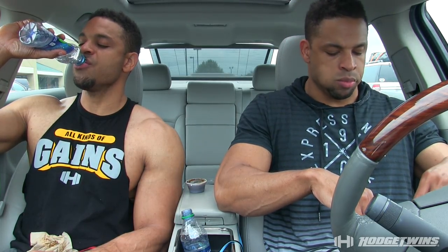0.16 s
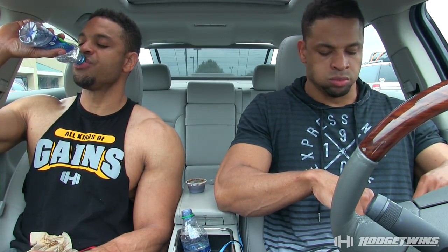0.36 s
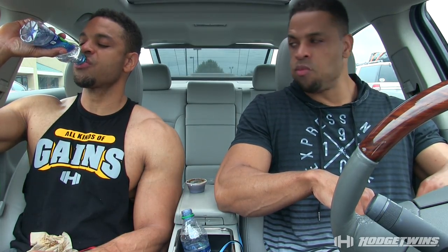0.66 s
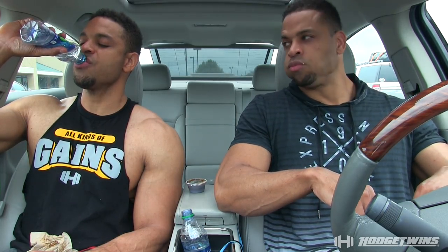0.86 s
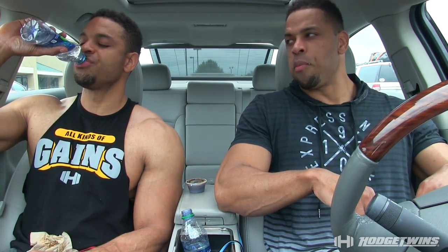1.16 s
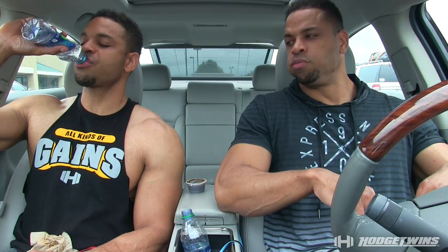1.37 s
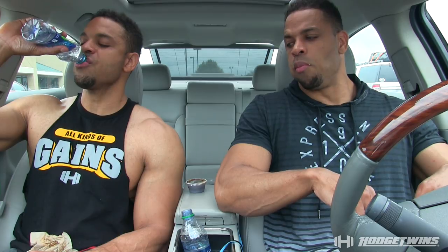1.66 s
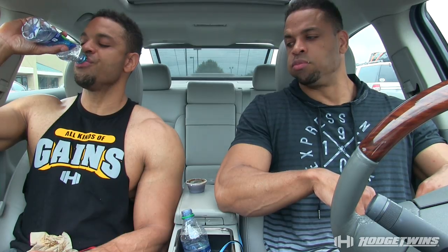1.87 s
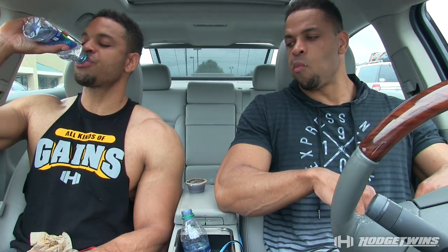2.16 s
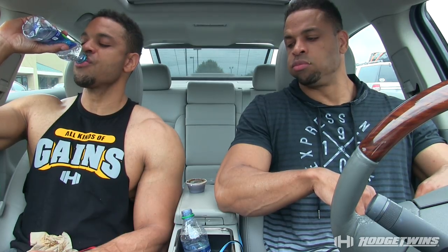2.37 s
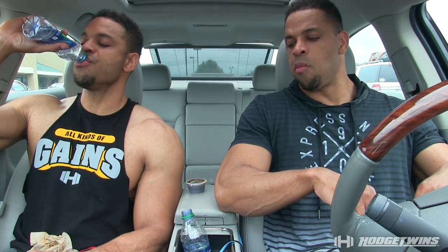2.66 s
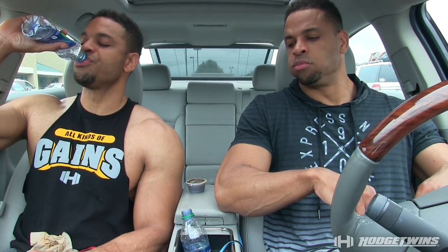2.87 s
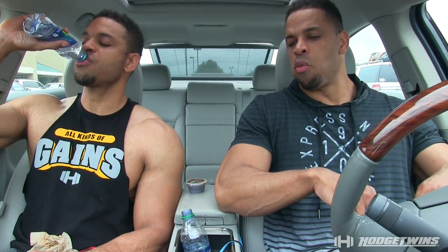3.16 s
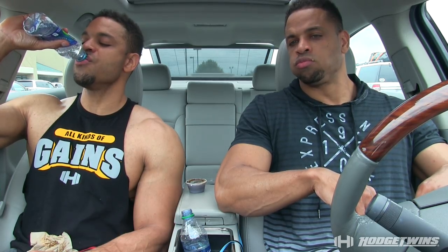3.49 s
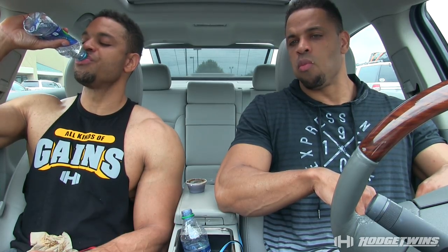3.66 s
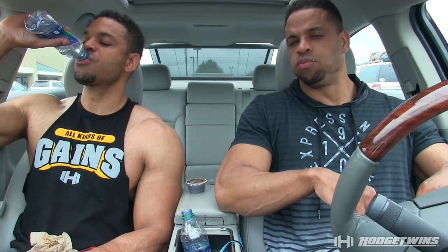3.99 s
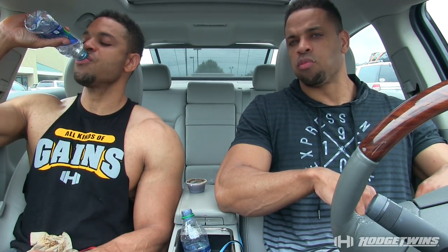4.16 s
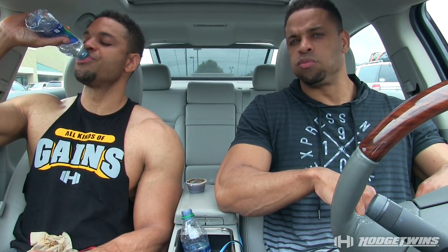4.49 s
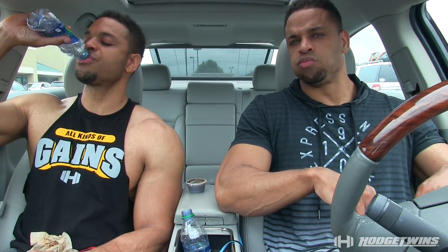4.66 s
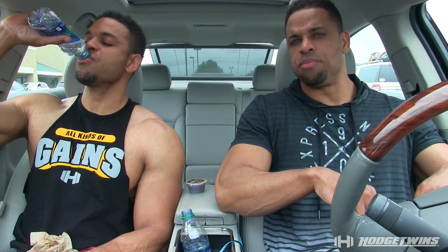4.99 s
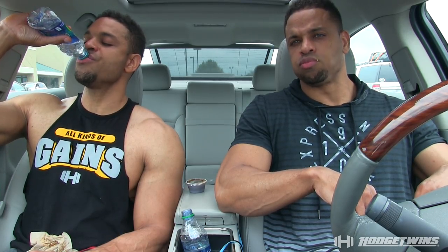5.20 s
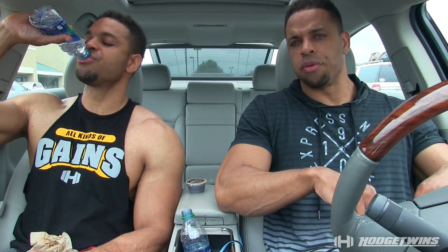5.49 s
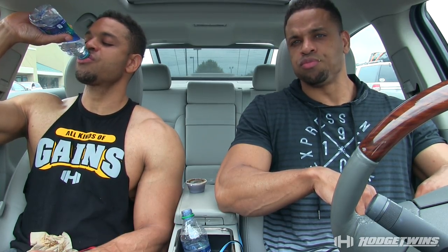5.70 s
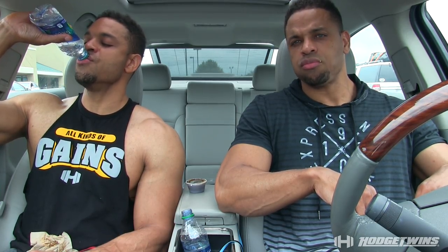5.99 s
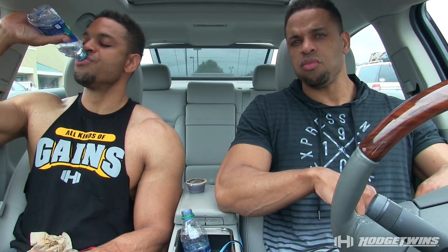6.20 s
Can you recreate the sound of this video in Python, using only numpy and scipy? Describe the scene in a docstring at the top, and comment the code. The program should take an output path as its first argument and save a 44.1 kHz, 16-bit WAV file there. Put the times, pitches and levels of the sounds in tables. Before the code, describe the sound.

Close stereo pickup inside a parked car, dry and padded, with a quiet low hum steady throughout. A thin ribbed plastic bottle, left of centre, is squeezed while someone drinks. A faint tick and a moderate click come near 0.2 s, then a brisk crackling burst from 0.7 to 1.0 s, strongest at the end, and a hard snap at 1.3. Only weak ticks follow until duller hollow pops around 2.4 to 2.7. Sharp snaps return at 3.1 and 3.45, then a pause, a very strong crack at 4.2, another at 4.35, and a tight cluster around 5.0. Sparse weak ticks lead to a last small crackle at 5.9 to 6.1. Between snaps are tiny grip rustles, faint rising bubbles, clearest near 4.75, a soft water wash stirred by the snaps, and barely audible high air whistles near 0.5, 3.9 and 6.1.

```python
"""Sharp plastic snaps, left of centre: a thin water bottle is squeezed by a drinker in a parked car.
Each snap is a noise click filtered by the ribbed wall, the hollow body and one panel; it dies fast.
Between snaps: grip rustles from clusters of tiny slips, bubbles as rising sines, thin whistles of air.
Under them: shaped noise for the run of water, stirred by each snap, and a low steady cabin hum."""
import sys
import numpy as np
from scipy import signal
from scipy.fft import rfft, irfft, next_fast_len
from scipy.io import wavfile
from scipy.ndimage import uniform_filter1d, map_coordinates

SR = 44100
rng = np.random.default_rng(int(sys.argv[2]) if len(sys.argv) > 2 else 0)


def inscribe(sig):
    """Save sig as 16-bit PCM at rate SR to the path in sys.argv[1].

    A 1-D sig is mono; a 2-D sig holds one channel per row.
    Samples are clipped to [-1, 1] before scaling.
    """
    pcm = np.round(np.clip(np.atleast_2d(sig).T, -1, 1) * 32767)
    wavfile.write(sys.argv[1], SR, pcm.astype(np.int16))


N = 279594  # samples


def amp(db):
    """Decibels to amplitude gain."""
    return 10 ** (np.asarray(db) / 20)


def unit(x):
    """Scale to rms 1."""
    return x / np.sqrt(np.mean(x ** 2) + 1e-20)


def along(points, hz):
    """Interpolate (f/Hz, value) points on a log frequency axis."""
    point_hz, values = np.transpose(points)
    return np.interp(np.log(hz + 1), np.log(point_hz), values)


def wobble(knots_per_s):
    """Smooth random curve of N samples through normal random knots."""
    knots = rng.standard_normal(int(N * knots_per_s / SR) + 4)
    return map_coordinates(knots, [np.arange(N) * knots_per_s / SR])


def filtered(x, response):
    """Apply a gain that is a function of frequency in Hz."""
    padded = next_fast_len(N + SR // 2)
    gain = response(np.fft.rfftfreq(padded, 1 / SR))
    return irfft(rfft(x, padded) * gain, padded)[..., :N]


def causal(db):
    """Minimum-phase response with these gains: rings only after the blow."""
    cepstrum = irfft(np.log(amp(db)))
    half = len(cepstrum) // 2
    cepstrum[1:half] *= 2
    cepstrum[half + 1:] = 0
    return np.exp(rfft(cepstrum))


def bump(hz, centre_hz, width):
    """Resonance of height 1; width is the half-width at half height over the centre frequency."""
    return 1 / (1 + ((hz - centre_hz) / (width * centre_hz)) ** 2)


def stereo(pair, side_db, left_db):
    """Two unrelated signals as mid and side; left gets left_db more gain than right."""
    mid, side = pair[0], amp(side_db) * pair[1]
    left = (mid + side) * amp(left_db / 2)
    right = (mid - side) * amp(-left_db / 2)
    return np.array([left, right])


def add(track, start_s, sound):
    """Mix a sound into the track at start_s."""
    start = max(round(start_s * SR), 0)
    room = track[:, start:start + sound.shape[1]]
    room += sound[:, :room.shape[1]]


def cabin(t, sharp_db=0, left_db=2.0, t60_s=0.072, crack_t60_s=0.019, direct_db=13,
          creep_db=-9, creep_t60_s=0.0046, smooth_hz=420, lead_samples=192):
    """One click in the car: the crease creeps, cracks, and a short padded tail follows."""
    age = t - lead_samples / SR
    after = amp(-60 * np.abs(age) / t60_s) + amp(sharp_db - 60 * np.abs(age) / crack_t60_s)
    before = amp(creep_db - 60 * np.abs(age) / creep_t60_s)
    paths = rng.standard_normal((2, len(t))) * np.where(age < 0, before, after)
    paths[0, lead_samples + round(0.0009 * SR)] += amp(direct_db + sharp_db)
    spectrum = rfft(paths)
    # Level the broad colour; keep the fine comb of the many paths.
    smooth_bins = max(round(smooth_hz * len(t) / SR), 1)
    power = uniform_filter1d(np.abs(spectrum) ** 2, smooth_bins, axis=1)
    flat = spectrum / np.sqrt(np.abs(power) + 1e-12)
    # Long waves are nearly alike in both channels.
    side_db = along([(150, -17), (700, -6), (3000, -6.5)], np.fft.rfftfreq(len(t), 1 / SR))
    click = irfft(stereo(flat, side_db, left_db))
    return click * (t < t[-1] / 2)


# Broad colour of the wall, common to all snaps: f/Hz, level/dB
WALL_COLOUR = [(60, -25), (180, -8.5), (250, -11.5), (335, -1), (410, -6), (650, 2.5), (1000, -2.5),
               (1600, -2), (2300, -6.5), (3300, -1), (4300, -10), (5300, -9), (8000, -10), (12000, -16),
               (16000, -26.5)]
# Standing waves of the ribbed wall and the nulls between them: f/Hz, level/dB
RIB_MODES = [(450, -2.5), (645, -1), (790, 1), (912, -3.5), (968, 5), (1025, -8), (1085, 4), (1190, -0.5),
             (1450, 0), (1545, 4), (1700, -1.5), (1806, 2), (1875, -4.5), (1989, 7.5), (2123, 5.5),
             (2180, -2), (2255, 4), (2531, 4.5), (2740, 6), (3072, 3), (3376, -0.5), (3794, 4.5), (5100, 7),
             (5772, 5.5), (7341, 2.5)]


def ribbed_wall(hz, rib_half_width_hz=34, floor_db=-2):
    """Gain in dB of the ribbed wall: broad colour plus narrow modes and nulls."""
    ribs = sum(db * bump(hz, f, rib_half_width_hz / f) for f, db in RIB_MODES)
    # A small bottle radiates little deep bass.
    bass_cut = along([(110, -9.5), (170, 0)], hz)
    return along(WALL_COLOUR, hz) + floor_db + ribs + bass_cut


SNAP_LEFT_DB = 3
TREBLE_DB, TREBLE_SHARE = 3.5, 0.42  # lift at 5 kHz; share of brightness added there

# Wall buckles: t/s, level/dB, sharpness/dB, bass/dB, brightness/dB,
# hollow f/Hz, hollow level/dB, panel f/Hz, panel level/dB
BUCKLES = [(0.1753, -23, -5, -13, 20.5, 662, -5, 4050, 13.5), (0.2517, 6, -17, 2.5, -4, 464, 7, 2360, 12),
           (0.696, 6.5, -26, -4, -3.5, 630, 18, 2480, 8), (0.7068, 10, -6, 7, -4, 543, 4, 1090, 1.5),
           (0.856, -14, -5.5, 1, 10, 765, 16.5, 4113, 7), (0.908, 17.5, -5.5, -4, 5, 475, 0.5, 4200, 5),
           (0.959, 15, 0, 6, 8, 480, 6, 3540, 5.5), (1.2727, 15, -3, 3.5, 3.5, 590, 4, 2001, 13.5),
           (1.5886, -30.5, -8, -7, 17.5, 677, 0, 2130, 8), (1.6526, -24.5, 18, 18, -31, 743, 18, 1100, 19),
           (1.8365, -22, 4, -11.5, 4, 1100, 3, 3025, 4), (2.3253, -18, -12.5, 5, -4.5, 475, 4, 2650, 6.5),
           (2.4103, 8.5, -1.5, 0.5, -4, 596, 14, 1090, 1.5), (2.583, 2, 2, -7, -30, 630, 11, 1070, 8),
           (2.671, -7.5, -5.5, 3.5, -36.5, 794, 11, 1530, 11),
           (2.7246, 1.5, -4.5, -2, 2, 710, 2.5, 1850, 8), (3.1281, 16, -0.5, -6.5, -3.5, 784, 5, 4740, 11),
           (3.41, 3.5, 3, -1.5, -20.5, 635, 8, 1890, 5.5), (3.4545, 16, -3, 3, 7.5, 637, 10.5, 1080, 10),
           (3.5094, 2.5, -8, -10.5, -4.5, 539, 9.5, 3670, 4), (3.573, -24, -9, 0, -1, 592, 12, 3500, 1),
           (3.6389, -14, -11, -7, 21.5, 480, 7, 2430, 8.5),
           (4.1915, 20.5, 1.5, -8.5, -5, 744, 9.5, 5050, 6),
           (4.3617, 15.5, -6, -2.5, -3.5, 605, 10.5, 1590, 8),
           (4.4243, -2, 1.5, -12, 5.5, 723, -2.5, 2370, 8),
           (4.9158, -25.5, -4, -0.5, 16, 512, 9.5, 2222, 14),
           (4.9689, -32.5, 4, 1.5, 26, 730, 11, 2564, 5.5),
           (4.9905, 10, -7.5, -3.5, -6, 600, 3.5, 1360, 10.5), (5.0005, 15, -2, -11, 4, 1080, 5, 3100, 7.5),
           (5.0662, -2, -2.5, -14, 10, 720, 11.5, 2400, 13),
           (5.1112, 6, -10, 7, -20.5, 670, 6.5, 1900, 3.5),
           (5.4436, -12.5, 6.5, -9, 3.5, 631, 7.5, 2220, 24),
           (5.6175, -33.5, 3.5, -4, 20, 551, -0.5, 6700, 5),
           (5.8491, -17, -0.5, -9.5, 0.5, 500, 15, 2470, 12),
           (5.9032, -1, -1.5, -9.5, -32.5, 634, 10, 1834, 15.5),
           (5.945, -19, 4, 1.5, -16, 552, 12.5, 1123, 11.5), (6.0199, 3, 5, -11, -17.5, 633, 11.5, 3561, 7),
           (6.04, 9, 2, -4.5, -9, 533, 12.5, 2860, 0.5), (6.078, -16.5, 6, 8, -25, 620, 14, 1100, 14.5),
           (6.3245, -15.5, 6, -16.5, 1.5, 765, 11, 2120, 12.5)]


def snaps(size=8192, lead_samples=192, crack_db=3, ripple_db=2, ripple_hz=330, flip_s=0.017,
          tail_share=0.55):
    """Each buckle: a click coloured by the ribbed wall, the hollow body and the panel that flips."""
    out, t, hz = np.zeros((2, N)), np.arange(size) / SR, np.fft.rfftfreq(size, 1 / SR)
    wall = ribbed_wall(hz)
    flip = 1 / (1 + (np.maximum(t - lead_samples / SR, 0) / flip_s) ** 4)
    for s, db, sharp_db, bass_db, bright_db, hollow_hz, hollow_db, panel_hz, panel_db in BUCKLES:
        # Brightness lifts the treble along with the top; dull snaps lose both.
        treble_db = TREBLE_DB + TREBLE_SHARE * bright_db
        tilt = along([(300, bass_db), (1000, 0), (2200, 0.001), (5000, treble_db),
                      (12000, bright_db)], hz)
        body = db + wall + tilt + hollow_db * bump(hz, hollow_hz, width=0.17)
        panel = panel_db * bump(hz, panel_hz, width=0.14)
        # A random ripple in the upper colour makes each snap a little different.
        ripple = ripple_db * map_coordinates(rng.standard_normal(size), [hz / ripple_hz])
        ripple = ripple * along([(800, 0.062), (2500, 0.84)], hz)
        click = cabin(t, crack_db + sharp_db, SNAP_LEFT_DB)
        # Full panel ring while it flips; smoother colour in the tail.
        crack = rfft(click * flip) * causal(body + panel + ripple)
        tail = rfft(click * (1 - flip)) * causal(body + tail_share * panel)
        add(out, s - lead_samples / SR, irfft(crack + tail))
    return out


# Shifts of the grip: t/s, length/s, level/dB, f/Hz
GRIP_SHIFTS = [(0.441, 0.17, -73.5, 2730), (1.013, 0.04, -65, 2870), (1.088, 0.0088, -69, 11940),
               (1.122, 0.0083, -62, 5700), (1.448, 0.069, -71, 2730), (1.774, 0.094, -66.5, 4150),
               (2.771, 0.053, -71.5, 3460), (3.036, 0.065, -65, 5154), (3.285, 0.06, -72.5, 2950),
               (4.492, 0.077, -66.5, 3410), (4.688, .015, -67, 4560), (4.787, 0.024, -72, 2515),
               (5.215, 0.11, -73, 2456), (5.409, 0.1, -71, 10030), (5.756, 0.18, -72, 4500),
               (6.271, 0.086, -68.5, 6310)]


def rustles(slips_per_s=260, scatter_db=4, width=0.16, size=4096):
    """The grip shifts: clusters of tiny slips that swell and fade."""
    out, t = np.zeros((2, N)), np.arange(size) / SR
    hz = np.fft.rfftfreq(size, 1 / SR)
    for s, length_s, db, centre_hz in GRIP_SHIFTS:
        count = max(round(length_s * slips_per_s), 2)
        cluster = np.zeros((2, int(length_s * SR) + size))
        places = rng.beta(2, 2, count)  # densest mid-cluster
        strengths, detunes = rng.standard_normal(count), rng.standard_normal(count)
        for place, strength, detune in zip(places, strengths, detunes):
            # Each slip rings its own small patch of film.
            resonance = np.sqrt(bump(hz, centre_hz * np.exp(0.18 * detune), width))
            patch = resonance * hz / (hz + centre_hz / 2)
            slip = irfft(rfft(cabin(t)) * patch)
            add(cluster, place * length_s, amp(scatter_db * strength) * slip)
        # Level is rms as if all energy fell within length_s.
        spread = np.sqrt(length_s * SR / cluster.shape[1])
        add(out, s, amp(db) * unit(cluster) * spread)
    return out


BURBLES_PER_S, BURBLE_DB = 1.5, -58.5  # level before gain_db
BURBLE_HZ, BURBLE_SPREAD = 1400, 0.33  # median pitch; sd of its natural log

# Clearest bubbles in the neck: t/s, level/dB (before gain_db), starting f/Hz
CLEAR_BUBBLES = [(0.2124, -51, 1470), (0.5337, -50, 1330), (1.4647, -52, 1059), (1.491, -51.5, 2380),
                 (2.3022, -52.5, 2420), (3.2219, -51, 1010), (3.8593, -53, 1100), (4.6759, -51.5, 1400),
                 (4.7521, -41, 1320), (4.8055, -52.5, 2380)]


def bubbles(size=4096, t60_s=0.016, rise_per_s=4, gain_db=-2):
    """Small bubbles ring at a rising pitch as air passes the neck; fainter ones come at random."""
    out, t = np.zeros((2, N)), np.arange(size) / SR
    faint = []
    for _ in range(round(BURBLES_PER_S * N / SR)):
        pitch_hz = BURBLE_HZ * np.exp(rng.normal(0, BURBLE_SPREAD))
        faint.append((rng.uniform(0, N / SR), BURBLE_DB + rng.normal(0, 2), pitch_hz))
    for s, db, hz in CLEAR_BUBBLES + faint:
        ring = np.sin(2 * np.pi * hz * t * (1 + rise_per_s * t)) * amp(-60 * t / t60_s)
        heard = irfft(rfft(ring) * rfft(cabin(t)))
        add(out, s, amp(db + gain_db) * heard / np.abs(heard).max())
    return out


# Air squeaking into the bottle: t/s, length/s, start f/Hz, end f/Hz, level/dB
AIR_SQUEAKS = [(0.51, 0.099, 10300, 10700, -81), (3.943, .12, 10300, 10500, -73),
               (6.068, 0.1, 12000, 12870, -76)]


def squeaks():
    """Air slips in through a narrow gap with a thin, rising, slightly unsteady whistle."""
    out = np.zeros((2, N))
    for s, length_s, start_hz, end_hz, db in AIR_SQUEAKS:
        count = int(length_s * SR)
        pitch_hz = np.linspace(start_hz, end_hz, count) + 50 * wobble(180)[:count]
        tone = np.sin(2 * np.pi * np.cumsum(pitch_hz) / SR)
        whistle = amp(db) * np.hanning(count) * tone
        add(out, s, np.array([whistle, whistle]))
    return out


FLOW_DB = -76  # steady run
SLOSH_DB, SLOSH_DB_PER_DB, SLOSH_T60_S = -73, 0.3, 0.55  # stir by a 0 dB snap; growth; decay


def flow(waver_db=0.84, knots_per_s=6):
    """Gain of the water: a steady run; every buckle stirs it, and it settles again."""
    stirs, t = np.zeros(N), np.arange(SR) / SR
    for s, db, *_ in BUCKLES:
        stirs[round(s * SR)] += amp(SLOSH_DB + SLOSH_DB_PER_DB * db) ** 2
    settling = amp(-60 * t / SLOSH_T60_S) ** 2
    slosh = np.abs(signal.fftconvolve(stirs, settling)[:N])
    return np.sqrt(amp(FLOW_DB) ** 2 + slosh) * amp(waver_db * wobble(knots_per_s))


# Colour of the moving water: f/Hz, level/dB
WATER_COLOUR = [(530, -37.5), (900, -7), (1120, -3.5), (1200, -9), (1410, 1), (1900, -18), (2420, -5),
                (3300, -14), (5610, -16.5), (6180, -24.5), (8250, -30.5), (10200, -24), (16000, -43)]


def trickle(patchy_db=3):
    """A faint wash of moving water: noise whose colour shifts from moment to moment."""
    noise = stereo(rng.standard_normal((2, N)), side_db=-2.0, left_db=1.5)
    frames = signal.stft(noise, nperseg=512)[2]
    blur = np.outer(np.hanning(9), np.hanning(11))  # bins x frames
    patches = signal.fftconvolve(rng.standard_normal(frames.shape[1:]), blur, "same")
    wash = signal.istft(frames * amp(patchy_db * unit(patches)), nperseg=512)[1][:, :N]
    water = filtered(wash, lambda hz: amp(along(WATER_COLOUR, hz)))
    return unit(water) * flow()


HUM_DB = -57.5  # rms

# Colour of the cabin's background: f/Hz, level/dB
HUM_COLOUR = [(15, -17), (32, -15.5), (48, -18), (95, -9), (125, -14), (160, -7), (190, -0.5), (245, -10),
              (320, -11), (400, -12), (620, -16), (1000, -27), (2000, -38.5), (6000, -43), (16000, -52.5)]


def hum():
    """Low steady noise, booming at one cabin resonance and nearly alike in both channels."""
    air = stereo(rng.standard_normal((2, N)), side_db=-13, left_db=-0.45)
    return amp(HUM_DB) * unit(filtered(air, lambda hz: amp(along(HUM_COLOUR, hz))))


def scene():
    """The bottle, left of centre, over the cabin's hum."""
    return snaps() + rustles() + bubbles() + squeaks() + trickle() + hum()


TOP_HZ = 16200


def record(dry, ceiling=0.83):
    """Round off the highest peaks, then cut steeply above TOP_HZ."""
    held = dry / (1 + np.abs(dry / ceiling) ** 8) ** (1 / 8)
    return filtered(held, lambda hz: 1 / np.sqrt(1 + (hz / TOP_HZ) ** 160))


dry = scene()
out = record(dry)
inscribe(out)
```